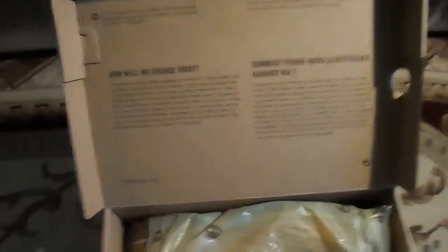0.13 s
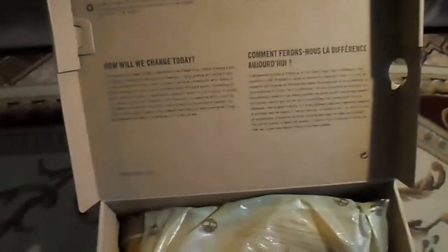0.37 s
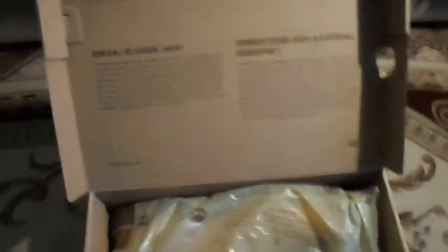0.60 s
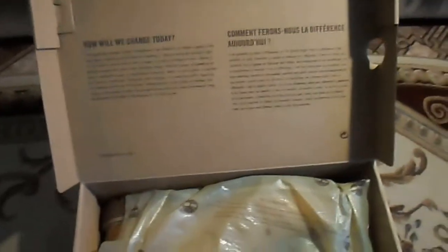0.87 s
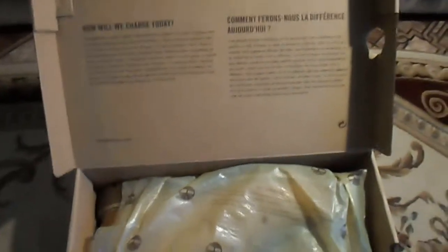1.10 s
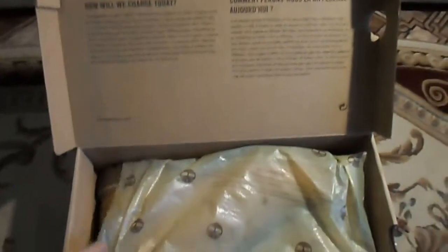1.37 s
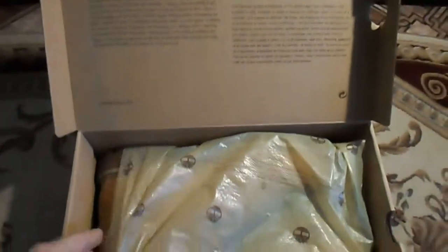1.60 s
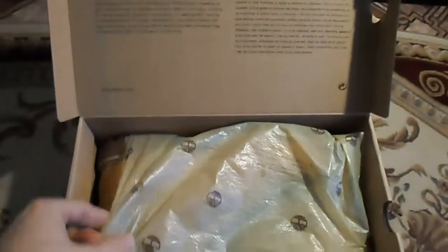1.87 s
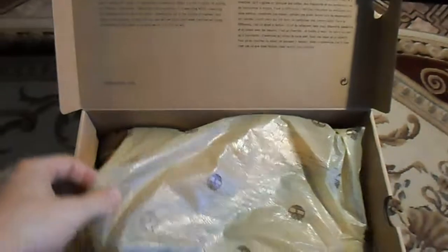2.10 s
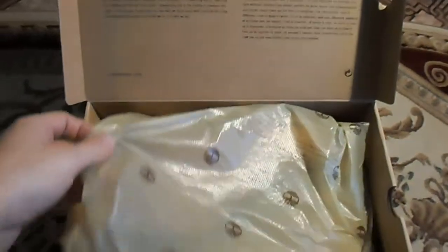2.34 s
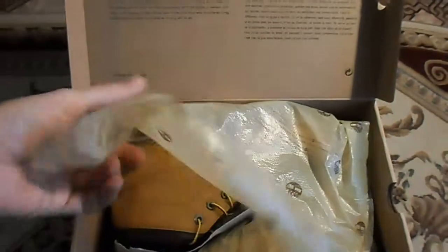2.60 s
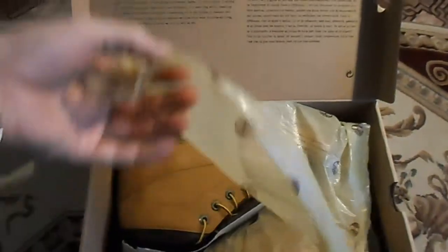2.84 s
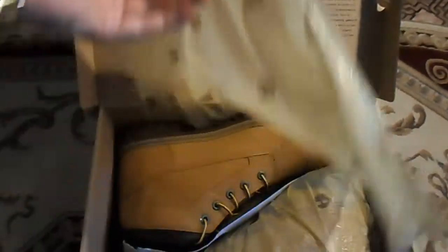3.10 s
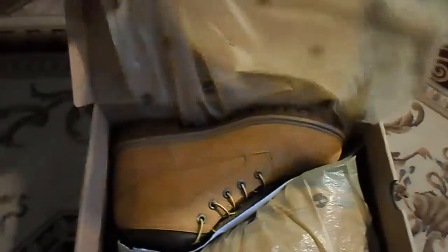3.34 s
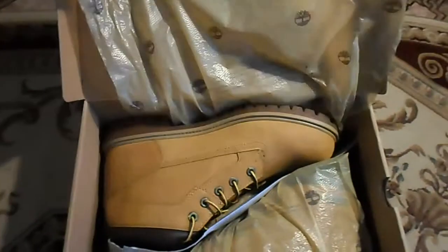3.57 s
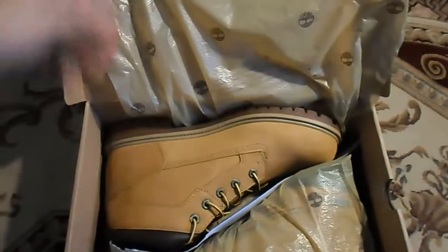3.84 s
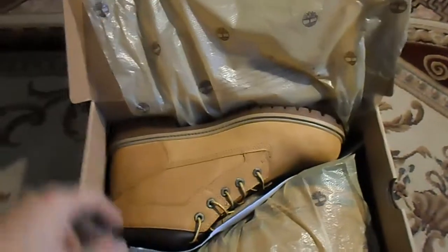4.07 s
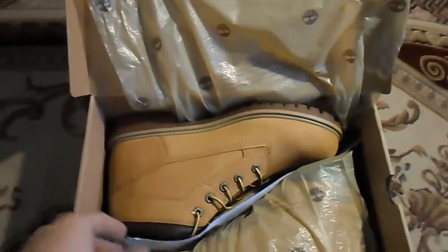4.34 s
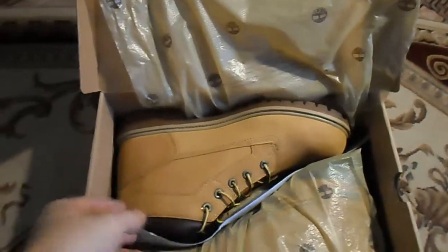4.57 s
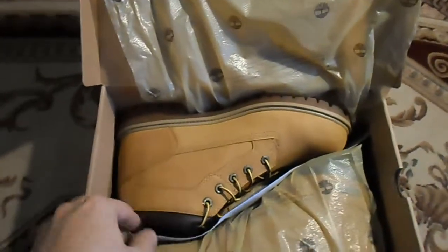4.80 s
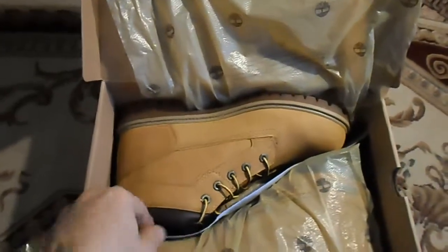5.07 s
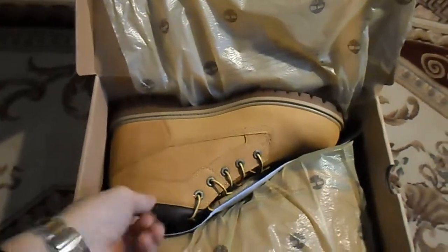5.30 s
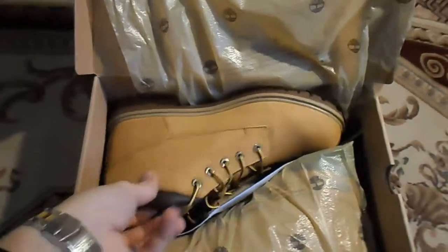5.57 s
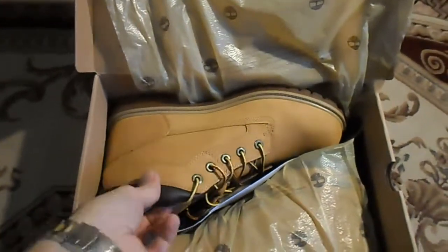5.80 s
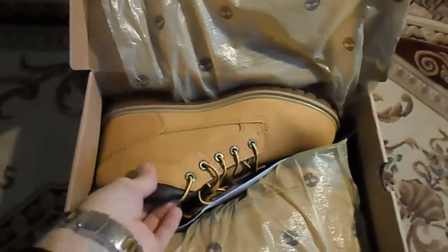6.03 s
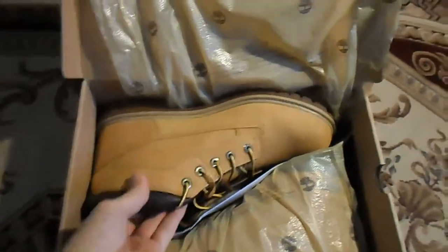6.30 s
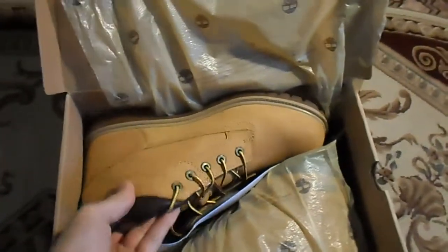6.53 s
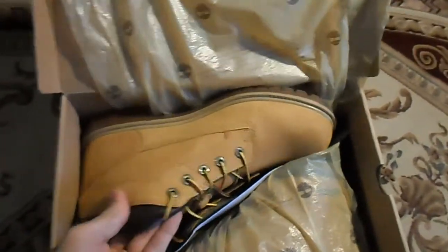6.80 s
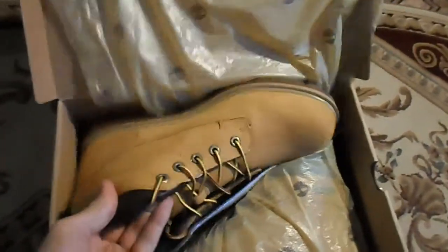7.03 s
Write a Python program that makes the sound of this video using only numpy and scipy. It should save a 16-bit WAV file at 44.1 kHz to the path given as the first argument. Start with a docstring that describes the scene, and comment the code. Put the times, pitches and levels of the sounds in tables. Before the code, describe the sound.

Near silence first, only faint room hum and hiss. Then dry, brittle wrapping rustles in uneven tugs, loudest just before the middle, with single snapping creases. After it falls away, sparse ticks, hollow cardboard taps and gentle rubbing come from a boot being touched and shifted. Close small microphone, short boxy reflections, one channel.

```python
"""Wrapping sheet pulled off a boxed boot

A hand pulls a thin crisp wrapping sheet back from a boot in a cardboard box, then handles the boot.
Creases are bursts of clicks, coloured and rung by patches of sheet; loud ones are placed singly.
Knocks ring box modes; scuffs are slip trains through a moving resonance. A carpeted room hums and
rumbles softly as shaped noise and a wavering sine. A small camera microphone samples it at half rate."""
import sys
import numpy as np
from scipy import signal
from scipy.fft import rfft, irfft
from scipy.io import wavfile
from scipy.ndimage import uniform_filter1d

SR = 44100
rng = np.random.default_rng(int(sys.argv[2]) if len(sys.argv) > 2 else 0)


def master_out(mix):
    """Clip the mix to full scale and print it as 16-bit PCM to the path in sys.argv[1]."""
    frames = np.transpose(np.atleast_2d(mix))
    ceiling = np.clip(frames, -1, 1)
    pcm = np.round(ceiling * 32767).astype(np.int16)
    wavfile.write(sys.argv[1], SR, pcm)


def elevation(decibels):
    """Turn decibel levels (scalar or array-like) into linear amplitude ratios."""
    levels = np.asarray(decibels, float)
    return 10 ** (levels / 20)


N = 315756

# tugs and brushes on the sheet:
# (start [s], hold [s], crackle level [dB], slack folds against the slack rule [dB])
TUGS = [(.43, 0.09, -93, 19.5), (.6, .05, -93, 18.5), (1.364, 0.13, -76, 8), (1.555, 0.23, -62, -13),
        (1.754, .1, -44, -2.5), (1.891, 0.041, -40, 0), (1.977, 0.049, -48, 1), (2.034, 0.35, -50, -1),
        (2.341, .04, -47, 1), (2.39, 0.099, -43, 0), (2.495, 0.069, -42, 0), (2.575, 0.098, -37.5, 0),
        (2.675, 0.25, -44, 1), (2.957, .05, -54.5, 1), (3.03, 0.34, -47.5, -1), (3.237, .04, -40, 1),
        (3.284, 0.096, -36, -1), (3.393, 0.16, -40.5, 5.5), (3.504, 0.1, -33, -0.5),
        (3.62, 0.048, -38.5, 2), (3.69, 0.034, -32.5, 1.5), (3.74, 0.13, -39.5, 7), (3.899, 0.076, -41, 4),
        (3.995, 0.12, -62.5, -1.5), (4.139, 0.025, -58.5, 2.5), (4.33, 0.031, -76, 4),
        (4.532, .18, -67, 1.5), (4.738, 0.034, -60, 5), (4.795, 0.026, -60, -1), (4.929, .14, -64.5, 0),
        (5.101, .04, -59.5, -3), (5.25, 0.01, -73, 16), (5.3, 0.056, -62, -14), (5.487, .05, -55, 1.5),
        (5.557, 0.15, -67, 4), (5.687, 0.037, -56, 0), (5.73, 0.035, -72, -5), (5.782, 0.058, -60, 5),
        (5.848, 0.14, -50, 4), (5.958, 0.031, -50.5, 3.5), (5.988, 0.048, -41.5, 3),
        (6.05, 0.036, -53.5, 6), (6.1, 0.054, -58, 4), (6.187, 0.33, -62.5, -0.5), (6.546, .09, -61, 4),
        (6.63, .15, -60.5, 9), (6.795, .08, -55, 8.5), (6.89, .14, -57.5, 6), (7.06, .08, -54.5, 3),
        (7.116, .04, -44.5, 7)]
# single loud creases: (time [s], peak [dB], lower part against the peak [dB], pitch of lower part [Hz])
LOUD_CREASES = [(1.6927, -40, -30, 1450), (1.718, -45, -17, 1240), (1.7325, -43, -19, 1990),
                (1.7588, -31.5, -25, 1250), (1.7976, -37, -15, 4120), (1.838, -27, -26, 4200),
                (1.8892, -27, -21, 3230), (1.9849, -27.5, -9.5, 3180), (2.0053, -33, -24, 3320),
                (2.0487, -33, -16, 3350), (2.0965, -41, -12, 2250), (2.1183, -37, -23, 1830),
                (2.1288, -33.5, -25, 1320), (2.2022, -33.5, -11, 1240), (2.2239, -32.5, -12, 2800),
                (2.3321, -35, -14, 1317), (2.3712, -39, -23, 4000), (2.437, -35, -13, 1680),
                (2.4964, -32, -23, 2906), (2.509, -24, -24, 4330), (2.59, -27, -22, 2890),
                (2.6209, -33, -24, 4770), (2.6478, -21.5, -21, 2995), (2.7073, -30, -21, 1240),
                (2.7394, -37, -13, 3080), (2.7826, -30.5, -15.5, 2300), (2.8094, -36, -14, 4200),
                (2.8262, -33, -20, 4090), (2.8512, -29, -10, 3750), (2.9304, -32.5, -23, 4120),
                (3.0354, -41, -19, 4770), (3.0577, -43, -15, 1250), (3.0782, -34, -16, 4620),
                (3.1465, -31, -15, 4116), (3.1849, -32.5, -14, 4090), (3.237, -35.5, -17, 2980),
                (3.2869, -27, -25, 4610), (3.3296, -21, -24, 4100), (3.4185, -24.5, -19, 4840),
                (3.4476, -26, -21, 4590), (3.5109, -21.5, -14, 4340), (3.546, -22, -21, 2740),
                (3.57, -26, -24, 4400), (3.6072, -22, -27, 4660), (3.6322, -26, -24, 4340),
                (3.6823, -25, -21, 4370), (3.71, -16, -21, 4760), (3.7854, -25.5, -13, 4740),
                (3.8227, -22, -22, 4550), (4.0334, -50, -15, 2530), (4.0588, -34.5, -19, 2020),
                (4.083, -42, -23, 3750), (4.146, -37, -14, 2120), (4.1649, -37, -22, 4310),
                (4.3046, -45.5, -18, 1860), (4.338, -46.5, -19, 1460), (4.7579, -37.5, -21, 1460),
                (4.8257, -46, -13, 2070), (5.2492, -50.5, 11.5, 1520), (5.3002, -43.5, -16, 2050),
                (5.3821, -41.5, -18, 1240), (5.473, -46.5, 5.5, 4500), (5.4916, -42, -10, 1337),
                (5.628, -34, -31, 1426), (5.7892, -53, -18, 1280), (5.8054, -38, -14, 1320),
                (5.8548, -33.5, -14, 1330), (5.9382, -37, -8, 3350), (5.9594, -43, -11, 4130),
                (5.9906, -32, -8, 3370), (6.2382, -52, 7, 1200), (6.3118, -44, -10, 2180),
                (6.555, -47, -5, 1310), (6.6433, -46, -7, 1250), (6.8694, -44, -4, 2330),
                (6.9391, -47, -10, 1340), (7.0387, -34.5, -23, 1250), (7.0878, -36, -17, 2500),
                (7.1479, -28, -24, 4800)]
# boot, laces and fingers against the box:
# (time [s], peak of low part [dB], low pitch [Hz], high pitch [Hz], high part against that peak [dB])
KNOCKS = [(3.706, -39.5, 1070, 2380, 3), (3.87, -26, 397, 3750, -20), (3.939, -37, 425, 4570, -7),
          (4.823, -44, 533, 1826, -19), (5.25, -35, 440, 1540, -2.5), (5.492, -23.5, 616, 1330, -10.5),
          (5.808, -41, 724, 1320, -7), (5.856, -35, 723, 1330, -1), (6.043, -35.5, 579, 1240, -8),
          (6.236, -40, 726, 1250, -2), (6.297, -41.5, 321, 1540, -7), (6.452, -40, 453, 1440, -7.5),
          (6.576, -41.5, 510, 2026, -11), (6.599, -47, 492, 2140, -6), (6.643, -39, 495, 1230, -1),
          (6.663, -41, 356, 1280, -7), (7.058, -36, 412, 1227, -3.5), (7.092, -35, 630, 3400, -9),
          (7.129, -41, 479, 1805, 4)]
# leather and card rubbing: (start [s], hold [s], level [dB], pitch of the hollow [Hz])
STROKES = [(1.558, 0.15, -65, 405.3), (1.789, .11, -58.5, 461.6), (1.931, 0.23, -62, 508.5),
           (2.144, .38, -58, 469.7), (2.66, 0.25, -63.5, 599.2), (3.04, 0.2, -60.5, 419.4),
           (3.3, 0.47, -63.5, 684.4), (3.769, 0.16, -60.5, 449.4), (4.0, 0.097, -65, 370),
           (4.508, 0.56, -63.5, 390), (5.197, .26, -65.5, 421.5), (5.492, 0.059, -54, 508.2),
           (5.581, 0.12, -59.5, 389.6), (5.776, .2, -55, 650), (5.997, 0.054, -53, 582.4),
           (6.12, 0.45, -62.5, 400.8), (6.62, 0.24, -55.5, 523.1), (6.9, 0.16, -58.5, 490.5),
           (7.082, 0.1, -56.5, 517.8)]
# box modes: (frequency [Hz], level [dB], t60 [s])
BOX_MODES = [(70.4, -7, 0.19), (200, -54, 0.036), (255.3, 1.5, 0.37), (330, 2, 0.062), (375, -3.5, 0.084),
             (457, 0, 0.06), (534, 0, 0.02), (623, 1.5, 0.042), (687, 3, 0.069), (845, -10, 0.029),
             (1010, -7, 0.039), (1330, 8, .03), (1530, -26, .04), (2300, -15, 0.0252), (2840, -15, .025),
             (4350, -12, .025)]
# partials of a hard edge: (multiple of its pitch [1], gain [1])
EDGE_PARTIALS = [(1, 1), (1.9, 0.25), (2.9, 0.22)]
# pitches of the patches of sheet between creases: [Hz]
PATCH_HZ = [1460, 2500, 3050, 4860, 6300, 6830, 8880, 9440]
# colour of crisp creases: (frequency [Hz], gain [dB])
CRISP_COLOUR = [(1500, -12.5), (3000, -18), (4500, -8), (6500, -5), (8600, 1.5), (9900, 0), (11000, -4.5)]
# colour of slack folds and cracking surfaces: (frequency [Hz], gain [dB])
SLACK_COLOUR = [(250, -8), (500, -15), (1100, -5), (2300, -1), (4000, 1.5), (7000, -3)]
# colour of leather on card: (frequency [Hz], gain [dB])
RUB_COLOUR = [(120, -14.5), (230, 4.5), (450, -4.5), (700, -2.5), (1200, -2.5), (2500, -17.5)]
# colour of room rumble and microphone hiss: (frequency [Hz], gain [dB])
ROOM_COLOUR = [(10, -27.5), (20, 0), (30, -9.5), (40, -14), (55, -6.5), (80, -13), (180, -19.5),
               (240, -25.5), (470, -32), (950, -39), (2270, -43.5), (2500, -46.5), (7300, -52.5),
               (9840, -46.5), (12000, -60)]

CREASES_PER_S, SIZE_SPREAD_DB = 2500., 4.5
SLACK_DB, SLACK_SLOPE = -54.5, 0.61  # slack rule: level at -45 dB crackle; dB per dB of crackle
SLACK_SMOOTH_S = .04
TUG_RISE_DB_PER_S, TUG_FALL_DB_PER_S = 700, 303
STROKE_RISE_DB_PER_S, STROKE_FALL_DB_PER_S = 300.5, 120
HOLD_SAG_DB = 2.5
SNAP_HZ, SNAP_SPREAD_HZ, SNAP_T60_S = 8850, 450, 0.023
SNAP_RISE_S, SNAP_LEAD_S = .003, .001
CONTACT_MS, LANDING_S = 0.61, 0.00297
EDGE_T60_S, CRACK_T60_S, CRACK_DB = 0.02, 0.034, -8.5
TAIL_T60_S, TAIL_DB = 0.058, -14.5
ROOM_DB, HUM_DB, HUM_HZ = -48., -48, 29.9
HUM_WANDER_PER_S = 14
TOP_HZ = 9977


def sheet():
    """Creases buckle in bursts; ticks are broad or ring a patch; slack folds sound duller."""
    power = gestures(TUGS, TUG_RISE_DB_PER_S, TUG_FALL_DB_PER_S)
    total = power.sum(axis=0)
    crisp_db = every_sample(10 * np.log10(total))
    loose_db = every_sample(np.transpose(TUGS)[3] @ power / total)
    slack_db = SLACK_DB + SLACK_SLOPE * (crisp_db + 45) + loose_db
    slack_db = uniform_filter1d(slack_db, size=int(SLACK_SMOOTH_S * SR))  # big folds move sluggishly
    bursts = elevation(3.5 * walk(60) + 3. * walk(25))
    broad = clicks(CREASES_PER_S, SIZE_SPREAD_DB, bursts)
    # each patch has its own slow share of the movement
    patches = sum(elevation(5.0 * walk(22)) * ring(clicks(400, 3.7, bursts), hz, 1350.0) for hz in PATCH_HZ)
    crisp = unit(broad) + 0.81 * unit(patches)
    slack = unit(clicks(1500, 4.2, bursts)) + 0.69 * crisp
    slide = rng.standard_normal(N)  # sheet sliding over itself
    crisp_out = unit(colour(crisp + 0.65 * slide, CRISP_COLOUR)) * elevation(crisp_db)
    slack_out = unit(colour(slack + 0.42 * slide, SLACK_COLOUR)) * elevation(slack_db)
    return crisp_out + slack_out


def snaps():
    """Loud creases tear along in ragged ticks, favour a patch pitch and ring a larger fold."""
    t = np.arange(SR // 20) / SR
    count = len(LOUD_CREASES)
    noise = rng.standard_normal((count, len(t)))
    rise = np.minimum(t / SNAP_RISE_S, 1) ** 2
    ragged = elevation(0.65 * np.repeat(rng.standard_normal((count, len(t) // 21)), 21, axis=1))
    patch_hz = SNAP_HZ + SNAP_SPREAD_HZ * rng.standard_normal(count)
    out = np.zeros(N + len(t))
    for (s, db, body_db, body_hz), top_hz, grit in zip(LOUD_CREASES, patch_hz, noise * ragged):
        burst = grit * rise * elevation(-60 * t / SNAP_T60_S)
        burst[int(SNAP_RISE_S * SR)] += 3.3 * np.sign(grit[0])  # the fold gives way in one tick
        top = colour(burst + 0.76 * ring(burst, top_hz, 1500.), CRISP_COLOUR)
        body = 0.25 * colour(burst, SLACK_COLOUR) + 7.4 * ring(burst, body_hz, 350.)
        snap = top / envelope_top(top) + elevation(body_db) * body / np.abs(body).max()
        i = int((s - SNAP_LEAD_S) * SR)
        out[i:i + len(t)] += elevation(db) * snap
    return out[:N]


def knocks():
    """Half-sine pushes of a blow ring box modes near one pitch; a hard edge rings, surfaces crack."""
    hz, mode_db, t60 = np.transpose(BOX_MODES)[:, :, None]
    t = np.arange(SR // 4) / SR
    chance = rng.standard_normal((len(KNOCKS), 2, len(BOX_MODES), 1))
    settling = rng.random((len(KNOCKS), 2, 5))
    cracks = rng.standard_normal((len(KNOCKS), len(t))) * elevation(-60 * t / CRACK_T60_S)
    push = np.sin(np.pi * np.clip(t[:300] * 1000 / CONTACT_MS, 0, 1))
    out = np.zeros(N + len(t))
    for row, (detune, share), (lag, size), grit in zip(KNOCKS, chance, settling, cracks):
        s, db, spot_hz, edge_hz, edge_db = row
        spot_db = 12.8 * np.exp(-(np.log2(hz / spot_hz) / 0.47) ** 2)
        mode_gain = elevation(mode_db + spot_db + 2.0 * share - 60 * t / t60)
        modes = mode_gain * np.sin(2 * np.pi * hz * (1 + 0.046 * detune) * t)
        # first touch, landing and small settling contacts
        train = np.zeros(SR // 20)
        train[((.006 + .03 * lag) * SR).astype(int) % len(train)] = 0.38 * (size - .5)
        train[0] = -0.22
        train[int(LANDING_S * SR)] = 1
        body = np.convolve(np.convolve(modes.sum(axis=0), push), train)[:len(t)]
        partials = sum(gain * np.sin(2 * np.pi * k * edge_hz * t) for k, gain in EDGE_PARTIALS)
        edge = np.convolve(elevation(-60 * t / EDGE_T60_S) * partials, train)[:len(t)]
        crack = np.convolve(colour(grit, SLACK_COLOUR), train)[:len(t)]
        high = edge / np.abs(edge).max() + elevation(CRACK_DB) * crack
        i = int(s * SR)
        out[i:i + len(t)] += elevation(db) * (body / np.abs(body).max() + elevation(edge_db) * high)
    return out[:N]


def scuff():
    """Leather drags on card in small slips, heard through the box and a moving hollow under the hand."""
    power = gestures(STROKES, STROKE_RISE_DB_PER_S, STROKE_FALL_DB_PER_S)
    total = power.sum(axis=0)
    hollow_hz = every_sample(np.transpose(STROKES)[3] @ power / total)
    slips = unit(clicks(500, 4.4, elevation(4 * walk(25)))) + .5 * rng.standard_normal(N)
    # a low-passed slip train carried on the hollow's pitch is a resonance that moves
    carrier = np.sin(2 * np.pi * np.cumsum(hollow_hz) / SR)
    hollow = uniform_filter1d(slips, size=SR // 200) * carrier
    rub = unit(colour(slips, RUB_COLOUR)) + 0.51 * unit(hollow)
    return unit(rub) * every_sample(np.sqrt(total))


def tail(x):
    """Box walls and room return a short dense echo: decaying noise convolved with the sound."""
    t = np.arange(SR // 2) / SR
    echo = rng.standard_normal(len(t)) * elevation(-60 * t / TAIL_T60_S) * (t > .001)
    echo = echo / np.sqrt(np.sum(echo ** 2))
    return x + elevation(TAIL_DB) * signal.fftconvolve(x, echo)[:N]


def room():
    """Smooth rumble and microphone hiss as coloured noise, with a low sine hum wavering in pitch and level."""
    noise = colour(rng.standard_normal(N + SR), ROOM_COLOUR)[SR:]  # filter onset dropped
    floor = unit(noise) * elevation(ROOM_DB)
    t = np.arange(N) / SR
    wobble_cycles = np.cumsum(walk(HUM_WANDER_PER_S)) * 3.99 / SR
    hum_gain = np.sqrt(2) * elevation(HUM_DB + 1.5 * walk(6))
    return floor + hum_gain * np.sin(2 * np.pi * (HUM_HZ * t + wobble_cycles))


def gestures(rows, rise_db_per_s, fall_db_per_s):
    """Power of each gesture every 32 samples: builds up to its start, sags while held, dies away."""
    start, hold, db = np.transpose(rows)[:3, :, None]
    since = np.arange(0, N, 32) / SR - start
    sag_db = HOLD_SAG_DB * np.clip(since / hold, 0, 1)
    fall_db = fall_db_per_s * np.maximum(since - hold, 0)
    rise_db = rise_db_per_s * np.maximum(-since, 0)
    return elevation(db - sag_db - fall_db - rise_db) ** 2 + 1e-14


def every_sample(control):
    """Interpolate a control given every 32 samples."""
    return np.interp(np.arange(N), np.arange(0, N, 32), control)


def clicks(per_s, spread_db, bursts):
    """Random clicks, mostly small and a few large, that crowd together in bursts."""
    hit = rng.random(N) < per_s * bursts / np.mean(bursts) / SR
    sign = rng.choice([-1., 1.], N)
    return hit * sign * elevation(spread_db * np.minimum(rng.exponential(size=N), 3.5))


def walk(rate_per_s):
    """Random levels held 1 / rate_per_s and slewed twice; spread near 1."""
    k = int(SR / rate_per_s)
    held = np.repeat(rng.standard_normal(N // k + 1), k)
    return 1.3 * uniform_filter1d(uniform_filter1d(held, k), k)[:N]


def ring(x, hz, width_hz):
    """Two-pole resonance with gain 1 at its centre."""
    return signal.lfilter(*signal.iirpeak(min(hz, 11000), hz / width_hz, fs=SR), x)


def colour(x, table):
    """Causal filter of (frequency [Hz], gain [dB]) points, from the folded cepstrum of the log gain."""
    hz, db = np.transpose(table)
    size = 2 ** 14
    grid_hz = np.maximum(np.arange(size // 2 + 1) * SR / size, 1)
    log_gain = np.interp(np.log(grid_hz), np.log(hz), db) * np.log(10) / 20
    ceps = irfft(log_gain)
    ceps[1:size // 2] *= 2
    ceps[size // 2 + 1:] = 0
    return signal.fftconvolve(x, irfft(np.exp(rfft(ceps))))[:len(x)]


def envelope_top(x):
    """Highest point of the envelope, averaged over half a ms."""
    return uniform_filter1d(np.abs(signal.hilbert(x)), size=SR // 2000).max()


def unit(x):
    """Scale to rms 1."""
    return x / np.sqrt(np.mean(x ** 2))


def scene():
    """All sources, one channel; the room stays outside the echo."""
    return (tail(sheet() + snaps() + knocks() + scuff()) + room())[None]


def top_cut(x):
    """Nothing passes above the cut-off."""
    return signal.sosfilt(signal.butter(12, 12705, fs=SR, output="sos"), x)


def record(dry):
    """Half-rate sampling cuts the top steeply; raising the rate leaves a faint mirror of the edge."""
    low_pass = signal.ellip(10, .3, 75, min(TOP_HZ, 11000), fs=SR, output="sos")
    x = signal.sosfilt(low_pass, dry)
    slope = signal.butter(12, 12000., fs=SR, output="sos")
    mirror = x * (-1.) ** np.arange(N)  # spectrum flipped about SR / 4
    mirror = signal.sosfilt(slope, signal.sosfilt(slope, mirror))
    return top_cut(x + elevation(-19) * mirror)


dry = scene()
out = record(dry)
master_out(out)
```